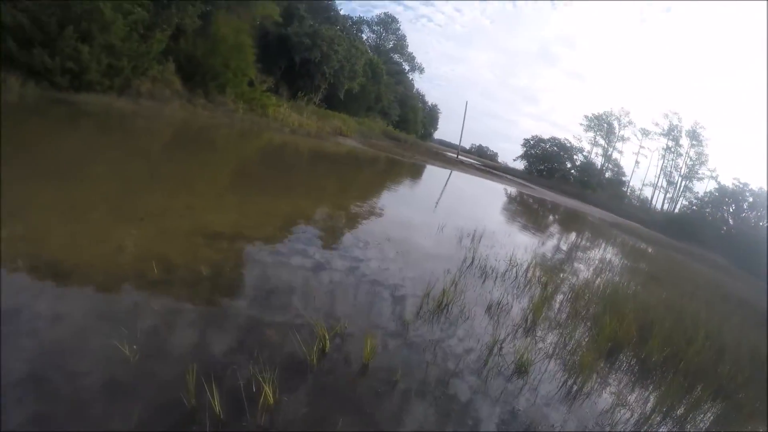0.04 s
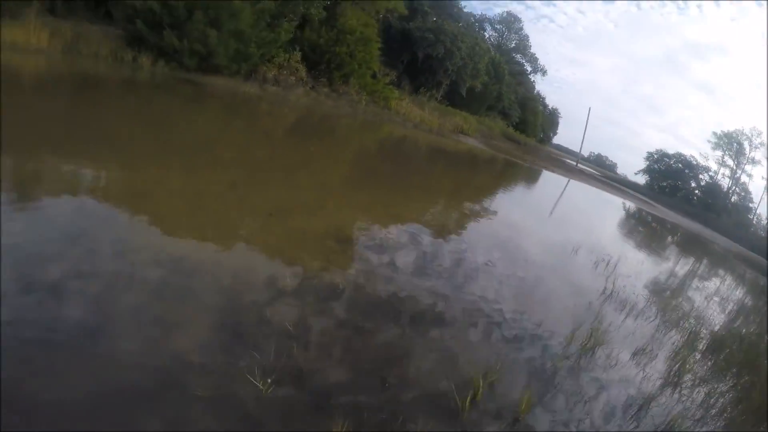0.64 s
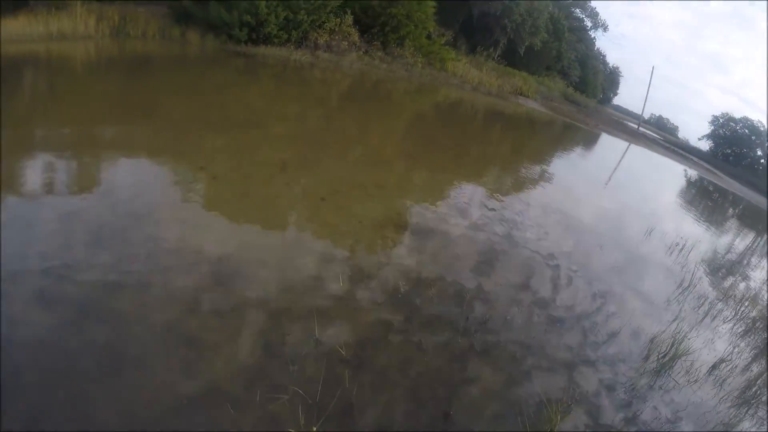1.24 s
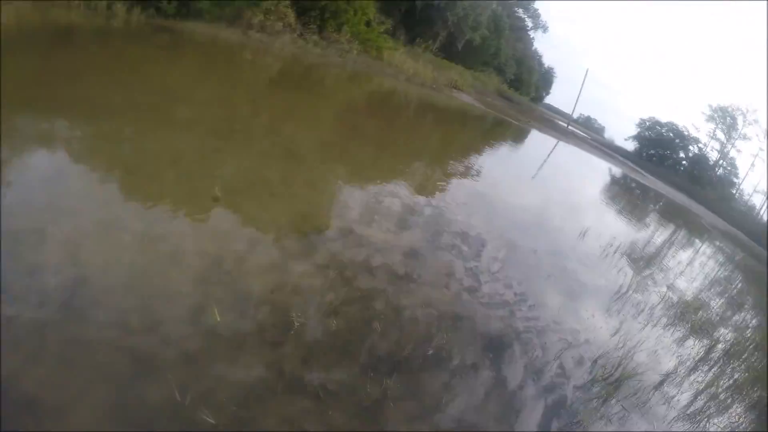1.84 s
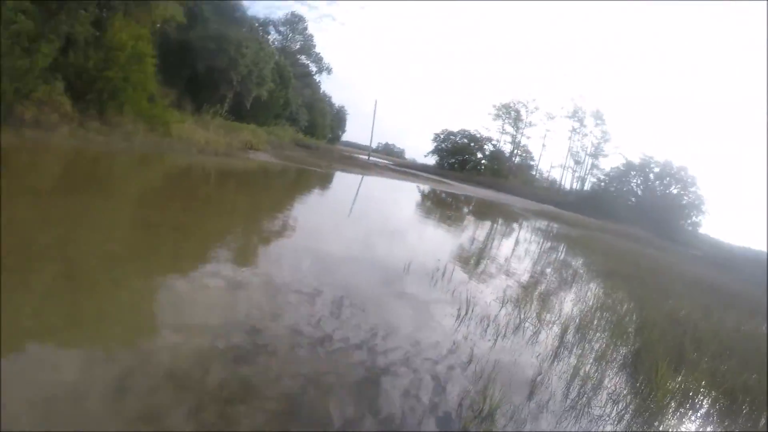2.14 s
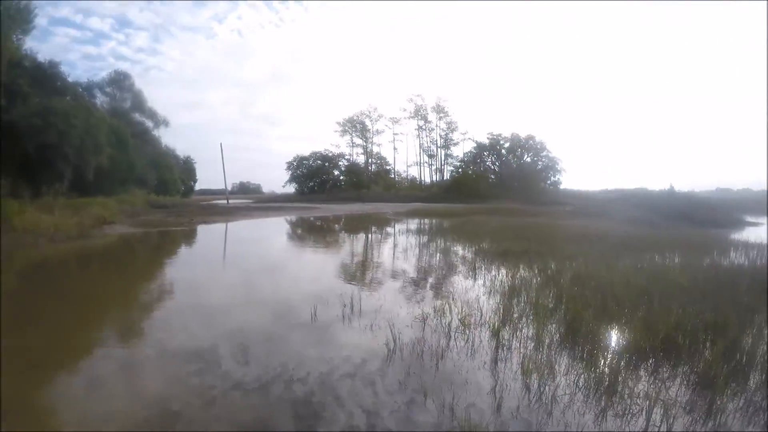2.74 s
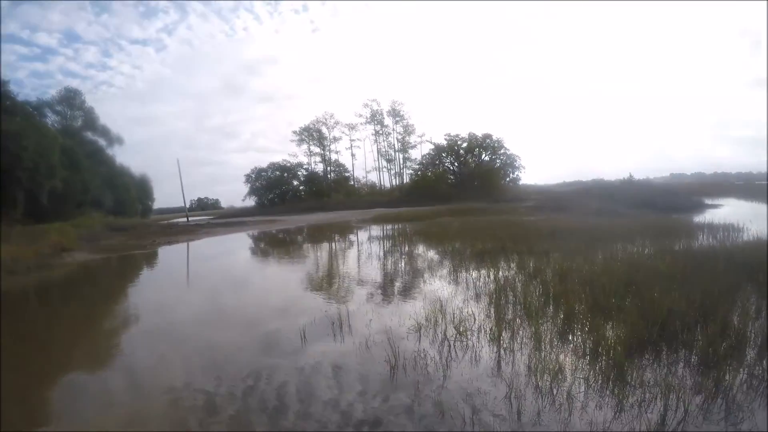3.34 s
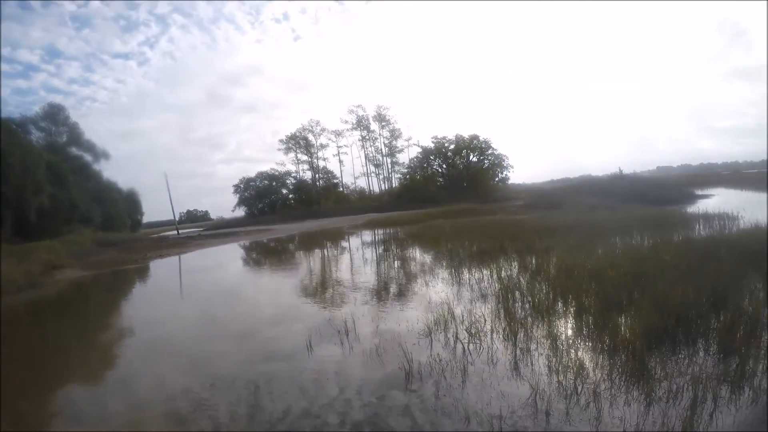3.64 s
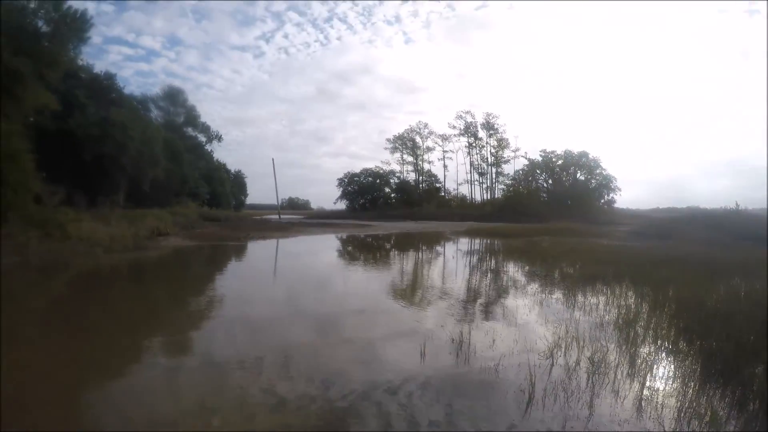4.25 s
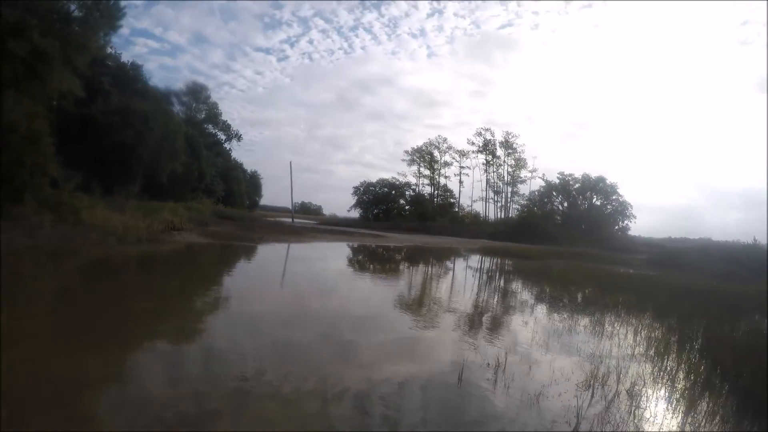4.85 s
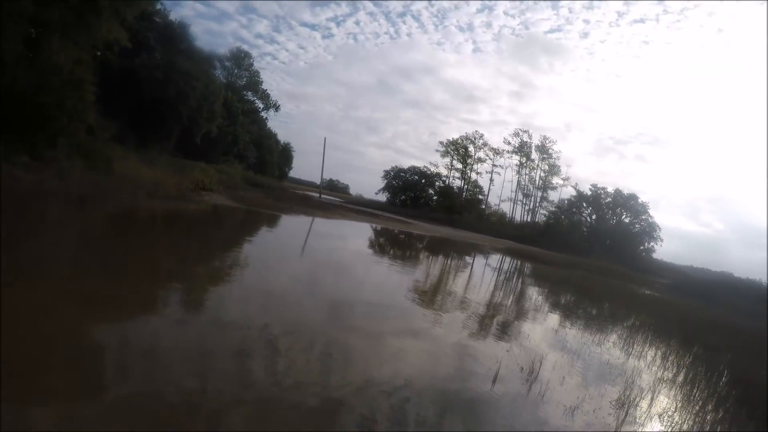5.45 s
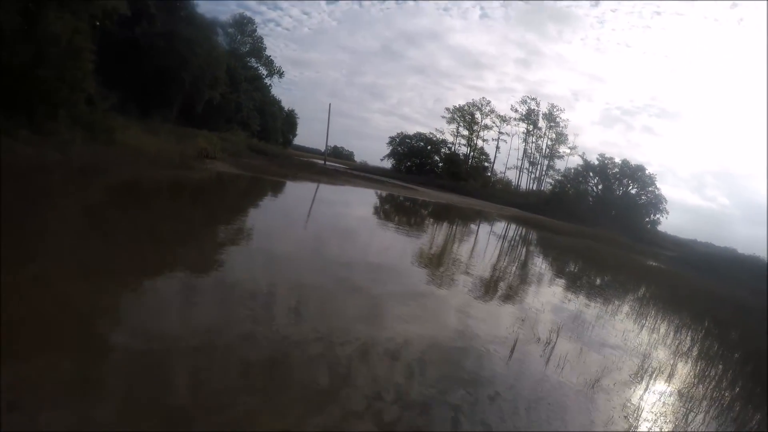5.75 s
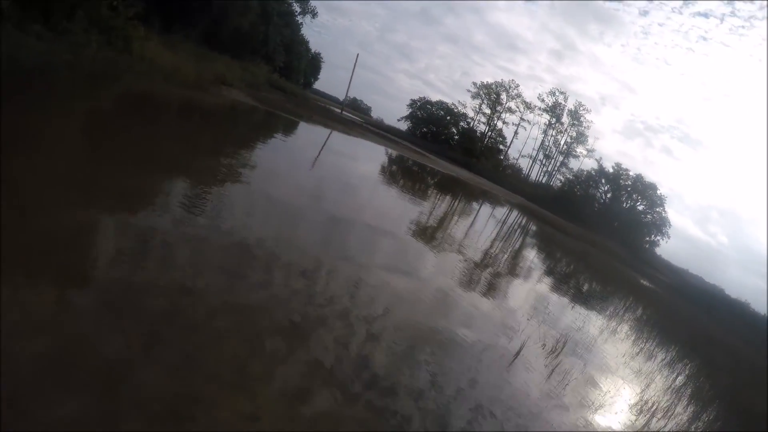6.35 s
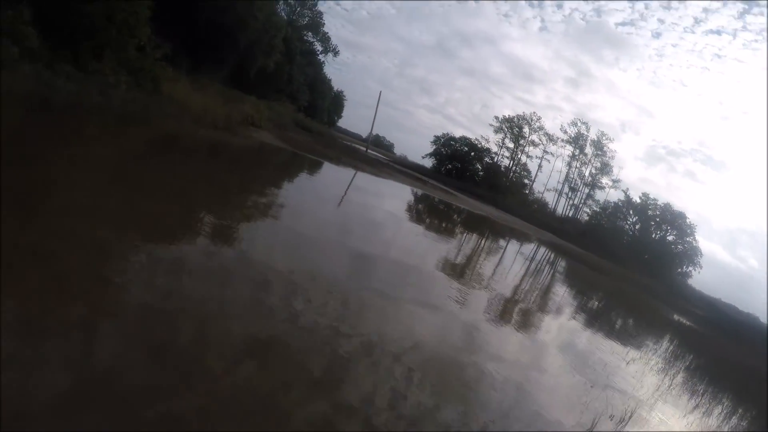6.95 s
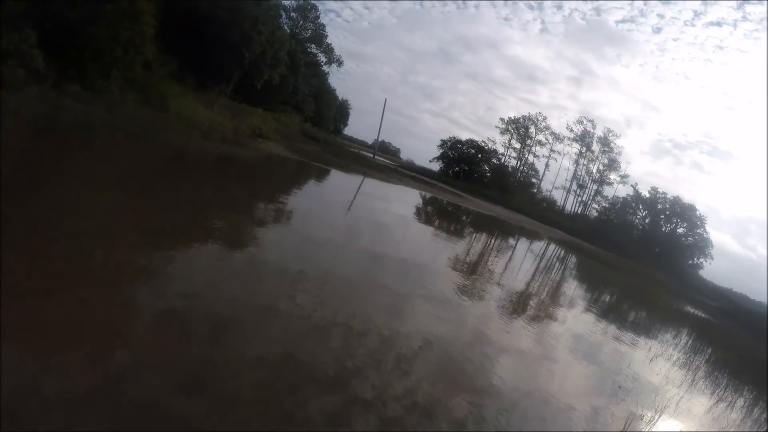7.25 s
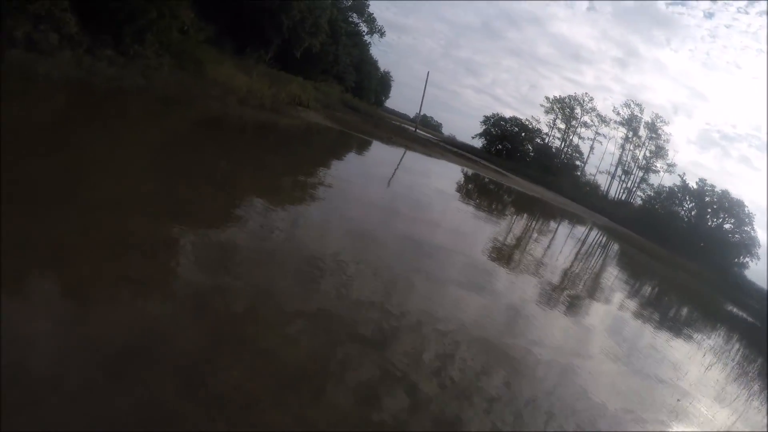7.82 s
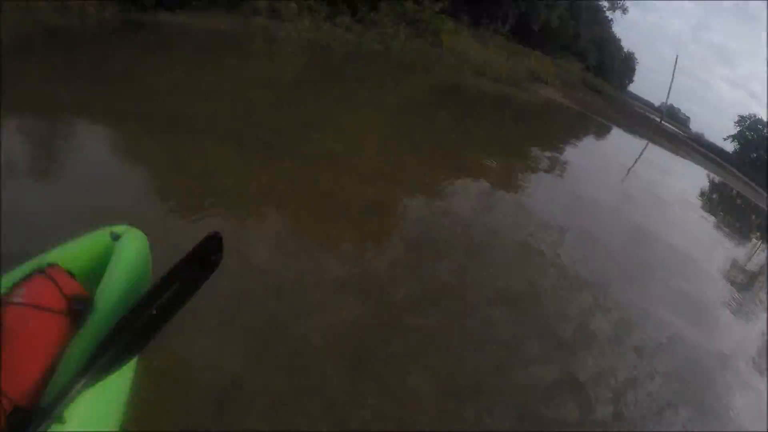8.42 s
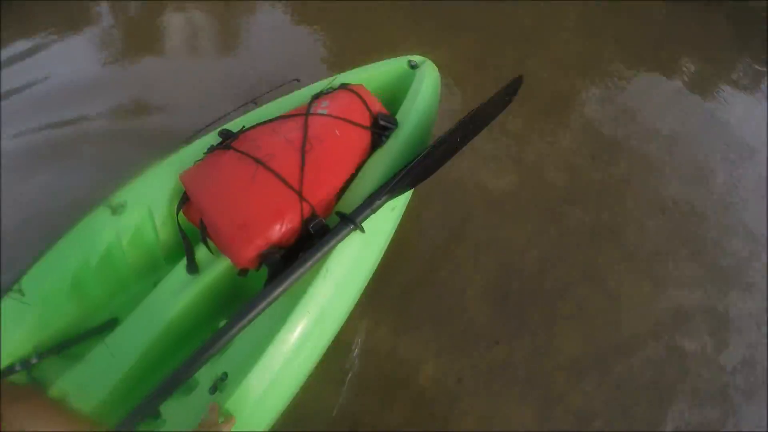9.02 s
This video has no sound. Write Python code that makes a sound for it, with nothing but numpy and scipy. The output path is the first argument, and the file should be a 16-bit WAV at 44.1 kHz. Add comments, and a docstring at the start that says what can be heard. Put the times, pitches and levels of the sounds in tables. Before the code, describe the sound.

Close to the microphone, someone wades slowly through the shallow water of a flooded marsh, about one stride a second. Each step makes a bubbly swish with small splashes, gulps and falling drops. Motors drone faintly far away, and light gusts of wind rumble on the microphone now and then. Near the end, ripples slap a plastic kayak alongside, giving a few hollow knocks and booms.

```python
"""Far motors drone over a flooded marsh, light gusts buffet the microphone, and close by someone wades
slowly, about one stride a second. Each leg pushes up a swish of tiny ringing bubbles and spray;
water smacks on water, pockets of air gulp shut and drops fall back. Near the end ripples slap
a plastic kayak alongside: its hollow shell knocks and the air trapped under it booms."""
import sys
import numpy as np
from scipy import signal
from scipy.fft import rfft, irfft, next_fast_len
from scipy.io import wavfile

SR = 44100
rng = np.random.default_rng(int(sys.argv[2]) if len(sys.argv) > 2 else 0)


def dump(signal):
    """Clip the signal to [-1, 1] and save it as 16-bit WAV at the path in sys.argv[1]."""
    limited = np.clip(np.atleast_2d(signal).T, -1, 1)
    pcm = np.round(limited * 32767).astype(np.int16)
    wavfile.write(sys.argv[1], SR, pcm)


N = 404686
TIME = np.arange(N) / SR

# hush of the open marsh: f/Hz, relative density/dB
MARSH_SPECTRUM = [(15, -28), (25, 2.5), (55, -1), (85, 3), (140, 0.5), (210, -4.5), (300, -8.5), (420, -12),
                  (684, -23), (1000, -31.5), (1570, -38), (2770, -38.5), (3720, -44), (4750, -40.5),
                  (8810, -51.5), (13000, -51.5), (15500, -57)]
# three far motors that swell and fade: t/s, f/Hz, level/dB
MIDDLE_MOTOR = [(0, 149, -46.5), (.7, 154, -49.5), (1.1, 159.8, -48), (1.7, 160, -50.5),
                (2.0, 162.7, -43.5), (2.6, 161.5, -52), (4.2, 162.2, -52), (4.7, 150.6, -80)]
LOW_MOTOR = [(4.4, 124.5, -58), (4.9, 128, -50), (5.6, 133.4, -52), (6.6, 133.7, -52.5),
             (7.2, 137.7, -45.5), (7.7, 139.3, -51), (9.2, 136.1, -55)]
HIGH_MOTOR = [(0, 288, -60.5), (2.3, 286, -55), (3.9, 290, -93), (4.6, 293, -54), (6.3, 295, -65),
              (7.5, 277, -54), (9.2, 280, -53.5)]
# steady far drone under them: f/Hz, width/Hz, level/dB
DRONE_TONES = [(61.4, 3, -48.5), (81.7, 1.5, -47.5), (117.2, 9.3, -62.5)]
# wind on the microphone: f/Hz, relative density/dB
WIND_SPECTRUM = [(10, -1), (24, 3), (35, 5.5), (50, 4.5), (80, -4), (150, -17.5), (270, -37), (400, -27.5),
                 (900, -63), (4000, -110)]
# gusts: crest t/s, level/dB, time to fall by a factor e/s
WIND_GUSTS = [(.55, -40.5, 0.17), (.85, -32, 0.21), (1.95, -37, 0.045), (2.65, -35.5, 0.17),
              (3.29, -30, 0.053), (3.49, -28, 0.12), (3.677, -27, 0.035), (7.142, -34, 0.055),
              (7.77, -38.5, 0.092), (8.84, -25, 0.2)]
# leg pushes: full push t/s, length/s, build-up/(dB/s), jump as the surface breaks/dB,
# then the drive of spray/dB, churning/dB, mist/dB, gurgle/dB
LEG_PUSHES = [(.47, 0.11, 31.5, 0.5, -50, -54, -66.5, -54), (1.391, 0.16, 51, 2, -48.5, -54, -73.5, -53.5),
              (2.421, .24, 25, 8.5, -51, -58.5, -70.5, -60.5),
              (3.52, 0.22, 90, 0, -53.5, -60.5, -72.5, -69),
              (4.591, 0.31, 39.5, 4.5, -51.5, -55.5, -70, -55.5),
              (5.579, 0.26, 22, 5, -52.5, -60, -65.5, -59), (6.529, 0.4, 40, 2, -51.5, -55.5, -66.5, -56),
              (7.442, .41, 27, 5.5, -51, -54.5, -71.5, -51.5), (8.26, .76, 49, 0.5, -54.5, -56.5, -78, -50)]
# sheets of water slapping down: t/s, spray lift/dB, churning lift/dB, length/s
WATER_SHEETS = [(0.338, 1.5, 8, 0.038), (0.498, 4.5, -4, 0.027), (0.621, 2, 6, 0.027), (1.35, 12, 2, 0.014),
                (1.467, 5, 8, 0.012), (1.521, 6.5, 8, 0.019), (1.611, -1, 17.5, 0.016),
                (1.647, 5.5, 14, 0.016), (1.778, 5, 15, 0.0194), (1.892, 8.5, 4, 0.025),
                (1.924, 8, 0, .012), (2.118, 13, 16, 0.01), (2.239, 11, -13, 0.011), (2.501, 5, 7.5, 0.026),
                (2.68, -2.5, 1.5, .016), (3.769, 6, 7, 0.018), (4.601, 5, 12, 0.03), (4.658, 4, 9, 0.017),
                (5.29, 19, 6, 0.0033), (5.893, -10, 8, 0.0059), (5.703, 1, 12.5, 0.013),
                (6.572, 12, 0, 0.0052), (6.594, -1, 8, 0.027), (6.738, 4, 8.5, 0.044), (7.417, 4, 3, .01),
                (7.539, 3, -20, 0.031), (7.688, 7, 1.5, 0.032), (7.911, 18.5, 11, 0.0074),
                (7.957, 5, 9, .008), (8.108, 14, 16, 0.0098), (8.131, 10, 10, 0.013),
                (8.177, 12.5, -1, 0.0088), (8.38, 11, 8.5, 0.005), (8.583, 4, 10, 0.032),
                (8.937, 9, 0, 0.0062)]
# colour of the splash and of its finest hiss: f/Hz, relative density/dB
SPLASH_SPECTRUM = [(380, 5), (520, 5), (750, -2.5), (1000, 0.5), (1400, -5.5), (1900, -3.5), (2700, 4.5),
                   (3700, -5), (4700, -7.5), (6200, -10.5), (7800, -16.5), (9200, -8), (11700, -9.5),
                   (14000, -12.5)]
MIST_SPECTRUM = [(8000, -38), (10000, -1.5), (11700, -17), (13000, -0.5), (14800, -2), (15500, -3.5)]
# flat smacks of water on water: t/s, peak level/dB, centre f/Hz, decay/s
WATER_SMACKS = [(0.073, -50, 6220, .0012), (0.1496, -50, 2200, 0.0025), (0.1598, -38, 1490, .002),
                (0.163, -47, 7000, 0.00091), (0.167, -40.5, 3280, .002), (.18, -51, 5960, .0015),
                (0.3585, -41, 2380, .002), (.6384, -38, 2670, 0.0081), (1.4404, -34, 4000, 0.0017),
                (1.897, -41, 3020, .003), (2.048, -45, 3000, 0.0013), (2.4041, -32, 2200, .0015),
                (2.495, -36, 2750, 0.0026), (3.49, -39, 3300, .0015), (3.7616, -35, 2650, 0.0026),
                (3.902, -44.5, 5500, .001), (4.151, -43, 2780, .002), (4.187, -40, 2200, .0025),
                (4.2467, -44, 2570, .002), (4.7544, -37, 3600, .0015), (5.579, -36, 3540, 0.002),
                (5.8985, -42, 1300, .0015), (6.194, -35.5, 5170, 0.0012), (6.4382, -30, 2640, .0013),
                (6.568, -29.5, 4400, .002), (6.5929, -32, 3570, 0.0018), (6.762, -34, 3120, .0015),
                (6.8325, -30, 3970, 0.0014), (7.466, -29, 3530, 0.00086), (7.6992, -31, 4400, 0.0017),
                (7.784, -35, 3500, .0018), (7.9615, -35, 2000, .002), (8.1031, -34, 4600, 0.0043)]
# air pockets closing: t/s, relative level/dB, f/Hz, t60/s, upward glide/ratio
AIR_POCKETS = [(0.08, -24, 396, 0.024, 0.45), (.506, -36, 784, 0.021, 0.4), (.603, -44, 740, 0.026, 0.1),
               (.832, -47, 1045, 0.067, 0.2), (.853, -36.5, 506, 0.026, 0.1),
               (0.924, -43.5, 493, 0.15, 0.04), (1.234, -39.5, 454, 0.042, 0.3),
               (1.43, -30.5, 378, 0.035, .05), (1.298, -38.5, 610, 0.036, 0.3), (1.353, -42, 501, .04, 0.2),
               (1.483, -38.5, 1250, 0.027, 0.1), (1.612, -25, 402, 0.044, 0.36),
               (1.687, -37, 467, 0.058, 0.2), (1.771, -35, 473, 0.05, 0.94), (1.784, -43, 720, .025, 0),
               (2.689, -44, 960, 0.025, 0.06), (2.701, -40, 383, 0.068, 0.1),
               (2.838, -32, 525, 0.057, 0.34), (3.238, -46, 723, 0.051, 0.65), (3.594, -42, 960, .03, 0.1),
               (4.315, -51.5, 1580, 0.051, .05), (4.514, -42.5, 986, 0.072, 0.08),
               (4.607, -41, 580, 0.036, 0.3), (4.671, -43, 1233, 0.023, 0.4),
               (4.829, -41.5, 1154, 0.045, 0), (5.126, -38, 382, 0.049, 0.53),
               (5.295, -43, 650, 0.12, 0.52), (5.601, -41.5, 563, 0.054, 0), (5.672, -44, 425, 0.12, 0.03),
               (5.727, -39, 953, 0.021, 0), (5.748, -42, 433, 0.19, 0.02), (5.818, -40.5, 485, 0.058, 0),
               (5.897, -35, 422, 0.043, 0), (5.898, -38, 570, 0.021, .1), (6.187, -36, 419, 0.05, 0),
               (6.235, -36, 313, 0.16, 0.5), (6.525, -43.5, 796, 0.035, 0.2), (6.542, -38, 470, 0.038, 0.1),
               (6.61, -40.5, 690, 0.075, 0.04), (6.655, -39, 505, .08, .5), (6.745, -35, 400, 0.073, .1),
               (6.772, -38.5, 860, .03, .1), (6.848, -37, 440, 0.099, 0.17), (6.93, -48, 775, 0.044, 0.1),
               (7.33, -37, 388, 0.12, 0), (7.471, -34, 477, 0.052, 0.64), (7.492, -44, 620, 0.046, 0.2),
               (7.628, -36, 429, 0.1, 0.4), (7.755, -36, 376, 0.15, 0.1), (7.914, -33.5, 500, 0.044, 0.02),
               (7.93, -33, 390, 0.057, 0.05), (7.962, -25, 486, 0.03, 0.23), (8.131, -34, 730, 0.03, 0.17),
               (8.193, -33.5, 495, 0.03, 0.06), (8.26, -36, 332, 0.1, 0.2),
               (8.381, -26.5, 520, 0.044, 0.23), (8.657, -43.5, 1400, 0.052, 0.4),
               (8.691, -39.5, 910, .03, 0.15), (8.736, -32, 380, 0.045, 0.1), (9.101, -38, 514, 0.063, 0.4)]
# big drops falling back: t/s, level/dB, f/Hz, t60/s
BIG_DROPS = [(.225, -41, 2750, 0.015), (.375, -43, 2616, .012), (.4775, -35, 5400, 0.015),
             (.541, -40, 4600, 0.0083), (.6297, -36, 2800, 0.014), (.753, -43, 2800, 0.011),
             (1.269, -42, 4790, 0.0081), (1.3515, -38, 2280, 0.033), (1.3663, -34, 4680, 0.0097),
             (1.3673, -37.5, 3000, 0.01), (1.41, -37, 2440, .012), (1.4404, -33.5, 4100, 0.007),
             (1.519, -39, 2336, 0.014), (1.6637, -37, 1520, 0.018), (1.8966, -33, 1610, 0.017),
             (1.926, -46, 1350, .02), (2.033, -53, 1350, .03), (2.0458, -43.5, 1560, 0.036),
             (2.4041, -33.5, 2360, 0.014), (2.4965, -35, 2680, 0.0098), (2.577, -42, 5168, .009),
             (2.608, -33.5, 2780, 0.0076), (2.611, -41, 4670, .009), (2.689, -38.5, 2650, 0.018),
             (3.484, -37.5, 2770, 0.013), (3.4903, -32.5, 3550, 0.0065), (3.5533, -35, 5300, 0.0051),
             (3.589, -38, 4613, .009), (3.775, -37, 3030, 0.017), (4.678, -37, 3060, 0.014),
             (4.681, -38, 6270, .007), (4.7547, -36.5, 5160, 0.01), (4.755, -47, 2440, .008),
             (4.8854, -32.5, 2740, 0.015), (5.084, -40.5, 4660, 0.014), (5.292, -34, 2780, 0.0097),
             (5.2955, -40, 5930, .007), (5.579, -40.5, 3240, 0.012), (5.6035, -33.5, 6100, 0.0057),
             (5.628, -40, 2340, 0.011), (5.673, -38, 3120, .012), (5.771, -40, 3230, 0.016),
             (5.851, -42, 4608, .009), (6.702, -30.5, 4200, 0.007), (6.8328, -27, 4550, 0.0056),
             (6.963, -47, 2794, .012), (7.014, -36.5, 2990, 0.0071), (7.388, -33.5, 3310, 0.015),
             (7.438, -39, 2170, 0.0069), (7.545, -36.5, 3140, 0.021), (7.64, -36, 3020, 0.016),
             (7.6995, -27, 4430, 0.0049), (7.962, -39, 1060, 0.0046), (7.962, -38, 3950, .007),
             (8.13, -37.5, 4230, 0.01), (8.178, -47, 4705, 0.0075), (8.283, -41, 2440, 0.012),
             (8.3817, -32.5, 4640, 0.012), (8.442, -40.5, 4160, .012), (8.49, -42, 2638, 0.018),
             (8.6756, -36.5, 2450, 0.02), (8.947, -39, 3800, 0.009)]
# bright snaps of bursting spray: t/s, relative level/dB, f/Hz
SPRAY_SNAPS = [(1.42, -45, 10900), (1.4208, -44, 13500), (1.4223, -41, 7940), (2.435, -52, 13700),
               (2.476, -55, 13800), (2.677, -55, 13400), (3.4004, -56, 9860), (3.47, -57, 12600),
               (3.608, -49, 13400), (4.592, -53, 13600), (4.783, -53, 14400), (4.928, -55, 13700),
               (5.2955, -47, 13100), (5.5223, -53, 14100), (6.195, -56, 10300), (6.4044, -48, 8400),
               (6.594, -46, 7240), (6.6554, -48, 7710), (6.656, -46, 14100), (6.9045, -43.5, 7460),
               (6.9345, -49, 7540), (7.466, -52, 10400), (7.7, -47, 6550), (8.1036, -44, 7690)]
# single eddies striking the microphone: crest t/s, relative level/dB, half length/s
MIC_EDDIES = [(2.652, -28, 0.063), (3.468, -19, 0.063), (8.761, -14, 0.056), (8.833, -9.5, 0.057),
              (8.937, -16, 0.062)]
# ripples slapping the hull: t/s, boom level/dB, knock level/dB, pitch/ratio, push length/s
HULL_SLAPS = [(7.972, -42, -51, 0.9, .008), (8.104, -32.5, -33.5, 1, 0.021), (8.381, -31, -27, 0.95, 0.014),
              (8.422, -35, -32, 0.94, .006), (8.564, -32, -35, 0.97, 0.029), (9, -37, -42, 0.92, 0.0079)]
# modes of the hollow plastic shell: f/Hz, relative level/dB, t60/s
HULL_MODES = [(208, 3, .06), (261, 2.5, 0.3), (314, 12.5, 0.14), (476, -3, 0.091), (550, -11, .08),
              (760, -21, .079), (1150, -17, .042)]


def gain_of(db):
    """Decibels to amplitude."""
    return 10 ** (np.asarray(db) / 20)


def unit_rms(x):
    """Scales to an rms of one."""
    return x / np.sqrt(np.mean(x ** 2) + 1e-20)


def level_at(spectrum, hz):
    """A spectrum's level in dB at any frequency."""
    f, db = np.transpose(spectrum)
    return np.interp(np.log(hz + 1), np.log(f + 1), db)


def add(mix, s, sound):
    """Mixes a sound in at s seconds."""
    part = mix[max(round(s * SR), 0):][:len(sound)]
    part += sound[:len(part)]


def band(x, low_hz, high_hz, order=2):
    """Band-pass filter."""
    return signal.sosfilt(signal.butter(order, [low_hz, high_hz], "band", fs=SR, output="sos"), x)


def noise(spectrum):
    """Steady noise of a given colour, rms one."""
    size = next_fast_len(N)
    colour = gain_of(level_at(spectrum, np.fft.rfftfreq(size, 1 / SR)))
    return unit_rms(irfft(rfft(rng.standard_normal(size)) * colour, size)[:N])


def wander(per_s):
    """A random curve of rms one, gliding to per_s new values a second."""
    knots = rng.standard_normal(4096)
    return unit_rms(np.interp(TIME * per_s, np.arange(len(knots)), knots))


def marsh_air():
    """The hush of open air all round the microphone, drifting slightly in level."""
    return noise(MARSH_SPECTRUM) * gain_of(-45.5 + wander(per_s=4))


def far_motors():
    """Motors a long way off, each one tone wavering on the breeze, over a low drone."""
    out = np.zeros(N)
    for motor, waver_hz in ((MIDDLE_MOTOR, 0.8), (LOW_MOTOR, 1.2), (HIGH_MOTOR, 22)):
        s, hz, db = np.transpose(motor)
        turns = np.cumsum(np.interp(TIME, s, hz) + waver_hz * wander(per_s=30)) / SR
        level = np.interp(TIME, s, gain_of(db), left=0, right=0) * gain_of(1.06 * wander(per_s=6.7))
        out += level * np.sin(2 * np.pi * turns)
    for hz, width_hz, db in DRONE_TONES:
        turns = np.cumsum(hz + width_hz / 2 * wander(per_s=3 * width_hz)) / SR
        out += gain_of(db + 1.37 * wander(per_s=3)) * np.sin(2 * np.pi * turns)
    return np.sqrt(2) * out


def wind():
    """Low turbulence right at the microphone: a light breeze with gusts on top."""
    breeze = gain_of(-46.5 + 1.5 * wander(per_s=8.6))
    gusts = sum(gain_of(db) * np.exp(-((TIME - s) / width) ** 2) for s, db, width in WIND_GUSTS)
    return noise(WIND_SPECTRUM) * np.hypot(breeze, gusts)


def water_drive():
    """Spray, churning, mist and gurgle in dB: each push builds, breaks the surface, sags and settles."""
    lapping_db = (-64.5, -63.5, -78.5, -67.5)  # the stirred water between strides
    steepness = (1, 1, 1, 2.1)  # large pockets only gurgle once the leg is moving
    break_s, sag_db_per_s, settle_db_per_s = 0.012, 4.5, 54
    power = gain_of(lapping_db)[:, None] ** 2
    for s, length, build_db_per_s, jump_db, *levels_db in LEG_PUSHES:
        age = TIME - s
        build_db = build_db_per_s * np.minimum(age, 0) + jump_db * np.clip(age / break_s, -1, 0)
        fade_db = sag_db_per_s * np.clip(age, 0, length) + settle_db_per_s * np.maximum(age - length, 0)
        push_db = np.array(levels_db)[:, None] + np.outer(steepness, build_db) - fade_db
        power = power + gain_of(push_db) ** 2
    uneven_db = 1.42 * wander(per_s=20)
    spray_db, churn_db, mist_db, gurgle_db = 10 * np.log10(power) + uneven_db
    for s, spray_lift_db, churn_lift_db, length in WATER_SHEETS:
        surge = np.exp(-(TIME[:SR // 10] / length) ** 2)  # starts at once, quickly subsides
        add(spray_db, s, spray_lift_db * surge)
        add(mist_db, s, 0.99 * spray_lift_db * surge)
        add(churn_db, s, churn_lift_db * surge)
        add(gurgle_db, s, churn_lift_db * surge)
    return spray_db, churn_db, mist_db, gurgle_db


def ring_bubbles(born, hz, strength, cycles, rise):
    """Sums many bubbles: each swells, then dies by 40 dB over its cycles while its pitch climbs."""
    swell_cycles = 2.18
    length = (cycles * SR / hz).astype(int) + 1
    # the samples of all bubbles laid end to end, each with its owner and age
    owner = np.repeat(np.arange(len(born)), length)
    age = np.arange(length.sum()) - (np.cumsum(length) - length)[owner]
    spent = age / length[owner]
    turns = hz[owner] * age / SR * (1 + rise[owner] * spent)
    envelope = np.minimum(turns / swell_cycles, 1) * np.exp(-4.6 * spent)
    ring = (strength / np.sqrt(length))[owner] * envelope * np.sin(2 * np.pi * turns)
    return np.bincount(born[owner] + age, ring, N)[:N]


def swarm(level_db, range_hz, per_s, cycles, rise, spread_db, clump_db, linger):
    """Countless bubbles in one pitch range; livelier water makes both more and louder ones."""
    low_hz, high_hz = range_hz
    level = gain_of(level_db)
    busy = np.sqrt(unit_rms(level)) * gain_of(clump_db * wander(per_s=70))
    born = np.flatnonzero(rng.random(N) < busy * per_s / SR)
    pitch, life, climb = rng.random((3, len(born)))
    hz = low_hz * (high_hz / low_hz) ** pitch
    vigour = np.minimum(rng.exponential(size=len(born)), np.pi)  # most are faint, a few stand out
    strength = gain_of(level_at(SPLASH_SPECTRUM, hz) + spread_db * vigour) * np.sqrt(hz)
    ring_cycles = cycles * 2 ** (linger * life ** 2 - 1)  # most burst quickly, a few ring on
    bubbles = ring_bubbles(born, hz, strength, ring_cycles, rise * climb)
    return unit_rms(bubbles * level ** 0.75) * np.sqrt(np.mean(level ** 2))


def leg_swish(spray_db, churn_db, mist_db, gurgle_db):
    """Close by, each leg churns up middling bubbles, tears the surface into fine ones and throws mist."""
    spurt_db = wander(per_s=100)  # the water breaks in quick spurts that most layers share
    gurgle = swarm(gurgle_db, range_hz=(343, 625),
                   per_s=70, cycles=17, rise=0.193, spread_db=3, clump_db=3, linger=2.56)
    churning = swarm(churn_db + 1.2 * spurt_db, range_hz=(689, 2088),
                     per_s=330, cycles=22.8, rise=0.163, spread_db=3, clump_db=4, linger=3.7)
    fine = swarm(spray_db + 2.15 * spurt_db, range_hz=(2052, 4167),
                 per_s=650, cycles=21, rise=0.093, spread_db=4, clump_db=1, linger=4.22)
    finer = swarm(0.73 * spray_db + 0.32 * mist_db + 1.9 * spurt_db, range_hz=(4240, 8330),
                  per_s=1600, cycles=18, rise=0.017, spread_db=4, clump_db=2, linger=4.5)
    crackle = swarm(mist_db, range_hz=(6780, 14600),
                    per_s=650, cycles=15, rise=0.022, spread_db=5, clump_db=4, linger=4.9)
    fizz = unit_rms(band(noise(SPLASH_SPECTRUM), low_hz=900, high_hz=8060, order=3))
    fizz *= gain_of(spray_db + 2.2 * spurt_db)
    mist = noise([(5000, -65)] + MIST_SPECTRUM)
    mist *= gain_of(mist_db + 5.1 * spurt_db + 2.5 * wander(per_s=400))
    return (gain_of(-1.5) * gurgle + gain_of(-3) * churning + gain_of(-4.5) * (fine + crackle)
            + gain_of(0.3) * finer + gain_of(-10) * fizz + gain_of(-2) * mist)


def smack(hz, decay_s):
    """Water meets water flat on: a burst of noise around hz with an instant attack."""
    t = np.arange(SR // 30) / SR
    burst = band(rng.standard_normal(len(t)) * np.exp(-t / decay_s), hz / 1.55, hz * 1.55, order=3)
    return burst / abs(burst).max()


def spray_patter(spray_db, per_s=45):
    """Small smacks of falling spray, following the strength of the splash that throws them."""
    out = np.zeros(N)
    for when, pitch in rng.random((int(per_s * N / SR), 2)):
        db = spray_db[int(when * N)] + 5 + 2 * min(rng.exponential(), np.pi)
        add(out, when * N / SR, gain_of(db) * smack(hz=1700 * 3.3 ** pitch, decay_s=0.0018))
    return out


def water_smacks():
    """Single flat impacts of water on water that stand out of the swish."""
    out = np.zeros(N)
    for s, db, hz, decay_s in WATER_SMACKS:
        add(out, s, gain_of(db) * smack(hz, decay_s))
    return out


def bubble(hz, t60, rise, swell_cycles):
    """One bubble rings and dies; its pitch climbs as it nears the surface."""
    t = np.arange(int(t60 * SR) + 2) / SR
    turns = hz * t * (1 + rise * (t / t60 - 1 / 4))
    onset = 1 - np.exp(-(t * hz / swell_cycles) ** 2)
    ring = np.sin(2 * np.pi * turns) * onset * gain_of(-60 * t / t60)
    return ring / (abs(ring).max() + 1e-9)


def splattered(ring, share, decay_s):
    """A ring plus the small splatter that follows an impact on water."""
    t = np.arange(SR // 20) / SR
    splatter = rng.standard_normal(len(t)) * np.exp(-t / decay_s)
    tail = signal.fftconvolve(ring, splatter)
    tail *= share * np.linalg.norm(ring) / np.linalg.norm(tail)
    add(tail, 0, ring)
    return tail


def gulps():
    """Pockets of air ring low as the water closes over them with a brief wet smack."""
    out = np.zeros(N)
    for s, db, hz, t60, glide in AIR_POCKETS:
        pocket = bubble(hz, t60, rise=glide, swell_cycles=0.81)
        closing = bubble(1.74 * hz, t60=0.0029, rise=0.42, swell_cycles=0.34)
        add(out, s, gain_of(db - 2) * splattered(pocket, share=0.6, decay_s=0.021))
        add(out, s, gain_of(db - 11.5) * closing)
    return out


def drips(per_s=13, low_hz=2230, high_hz=5980, ring_cycles=28):
    """Lesser drips trickle off the legs at random: rows of t/s, level/dB, f/Hz, t60/s."""
    when, chance, pitch = rng.random((3, 200))
    hz = low_hz * (high_hz / low_hz) ** pitch
    db = rng.normal(-49, 2, len(hz))
    rows = np.transpose([when * N / SR, db, hz, ring_cycles / hz])
    return list(rows[chance < per_s * N / SR / len(hz)])


def falling_drops():
    """Each drop lands with a blunt click and traps a small ringing bubble."""
    out = np.zeros(N)
    for s, db, hz, t60 in list(BIG_DROPS) + drips():
        ring = bubble(hz, t60, rise=0.14, swell_cycles=2)
        click = bubble(hz, t60=5 / hz, rise=0.96, swell_cycles=0.25)
        add(out, s, gain_of(db) * splattered(ring, share=0.5, decay_s=0.0053))
        add(out, s, gain_of(db - 10) * click)
    return out


def spray_snaps():
    """Spray bursts in very short, bright rings."""
    out = np.zeros(N)
    for s, db, hz in SPRAY_SNAPS:
        ring = bubble(hz, t60=0.0028, rise=0.093, swell_cycles=0.68)
        add(out, s, gain_of(db + 10) * splattered(ring, share=0.52, decay_s=0.0027))
    return out


def eddy_thumps(push_hz=42):
    """Single eddies strike the microphone: a low push of pressure with some flutter."""
    out = np.zeros(N)
    for s, db, half_s in MIC_EDDIES:
        t = np.linspace(-half_s, half_s, int(2 * half_s * SR))
        envelope = np.exp(-12 * (t / half_s) ** 2)
        push = np.cos(2 * np.pi * push_hz * t)
        flutter = unit_rms(band(rng.standard_normal(SR // 2), low_hz=51, high_hz=166))[-len(t):]
        add(out, s - half_s, gain_of(db - 5) * envelope * (push + 0.32 * flutter))
    return out


def kayak_hull():
    """Alongside, ripples knock on the shell and pump the air under it, which booms while they push."""
    cavity_hz, cavity_t60, swell_s = 376.8, 0.18, 0.0019
    out, t = np.zeros(N), np.arange(SR // 3) / SR
    for s, boom_db, knock_db, pitch, push_s in HULL_SLAPS:
        wobble = 1 + 0.032 * wander(per_s=87)[:len(t)]  # the moving waterline bends the pitch
        clock = np.cumsum(pitch * wobble) / SR
        envelope = (1 - np.exp(-t / swell_s)) * gain_of(-60 * np.maximum(t - push_s, 0) / cavity_t60)
        boom = envelope * np.sin(2 * np.pi * cavity_hz * clock)
        knock = sum(gain_of(db - 60 * t / t60) * np.sin(2 * np.pi * hz * clock)
                    for hz, db, t60 in HULL_MODES)
        add(out, s, gain_of(boom_db) * boom)
        add(out, s, gain_of(knock_db) * splattered(knock / abs(knock).max(), share=0.86, decay_s=0.0057))
    return out


def scene():
    """One microphone in the open marsh: motors far off, wader and kayak close by."""
    background = marsh_air() + far_motors() + wind()
    spray_db, churn_db, mist_db, gurgle_db = water_drive()
    wading = leg_swish(spray_db, churn_db, mist_db, gurgle_db) + spray_patter(spray_db)
    plops = water_smacks() + gulps() + falling_drops() + spray_snaps()
    return (background + wading + plops + eddy_thumps() + kayak_hull())[None]


def record(dry):
    """The microphone signal is cut off steeply above 15.6 kHz."""
    low_pass = signal.firwin(511, 15600, window=("kaiser", 9), fs=SR)
    return signal.oaconvolve(dry, low_pass[None], "same")


dry = scene()
out = record(dry)
dump(out)
```